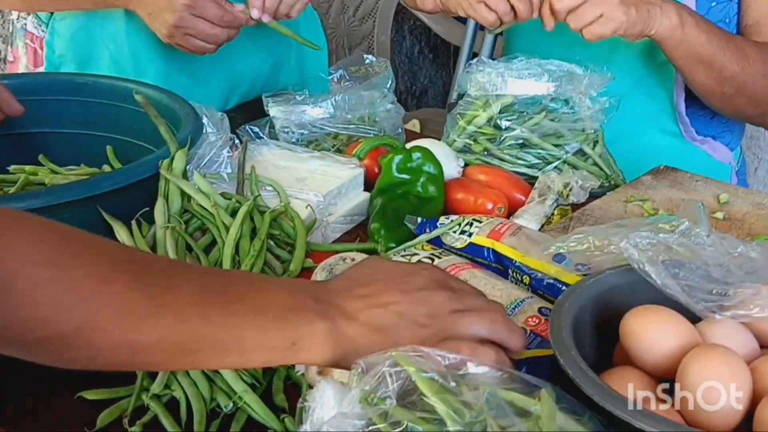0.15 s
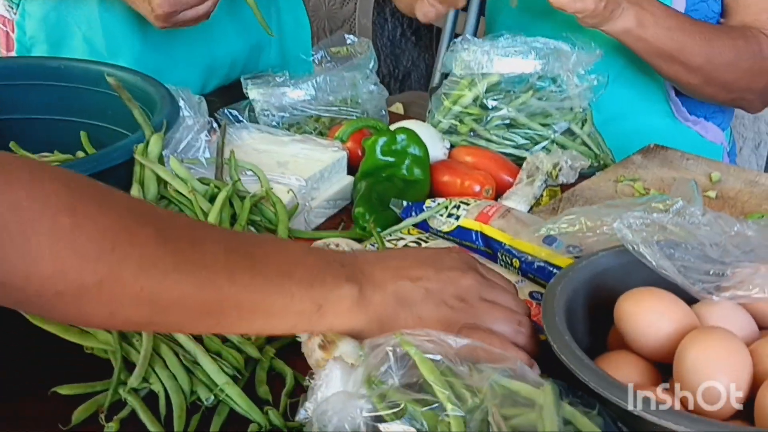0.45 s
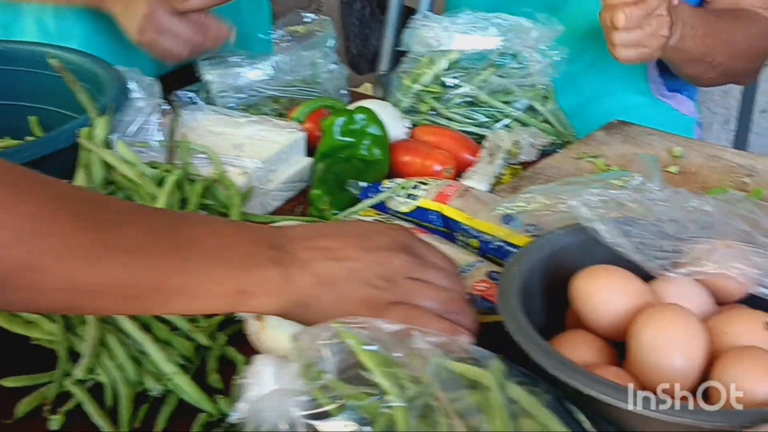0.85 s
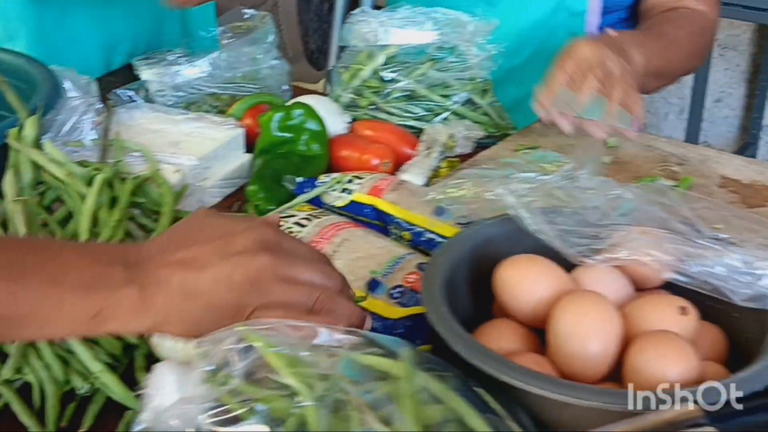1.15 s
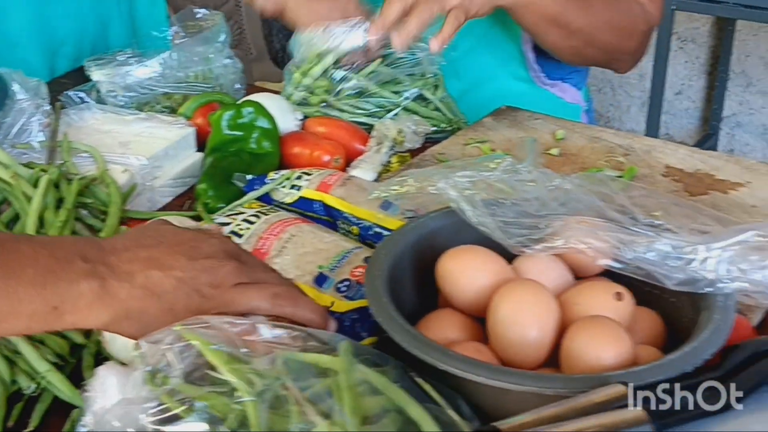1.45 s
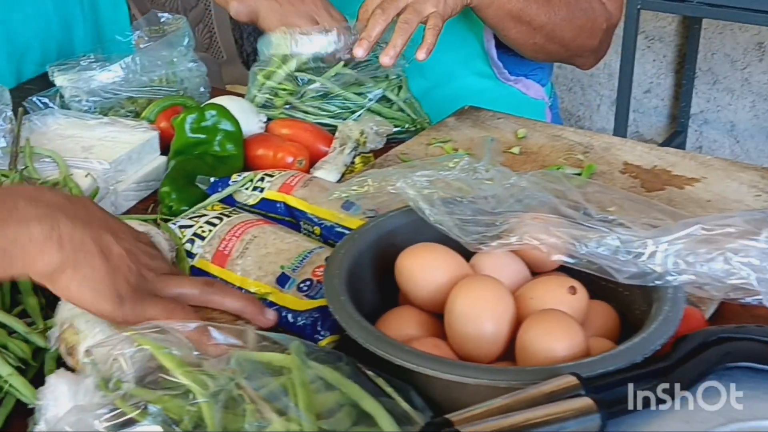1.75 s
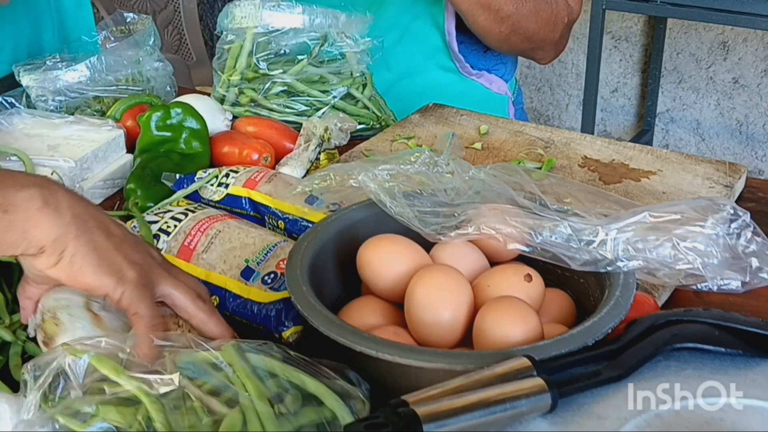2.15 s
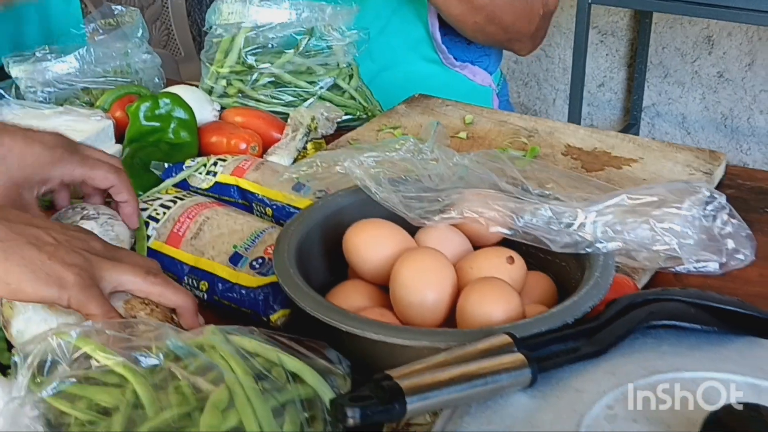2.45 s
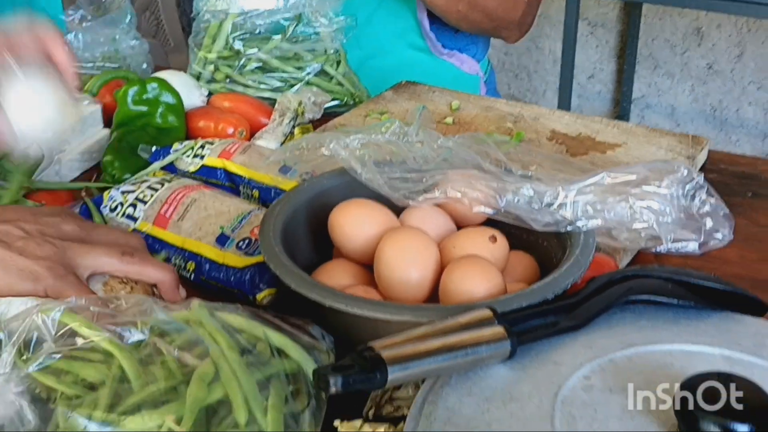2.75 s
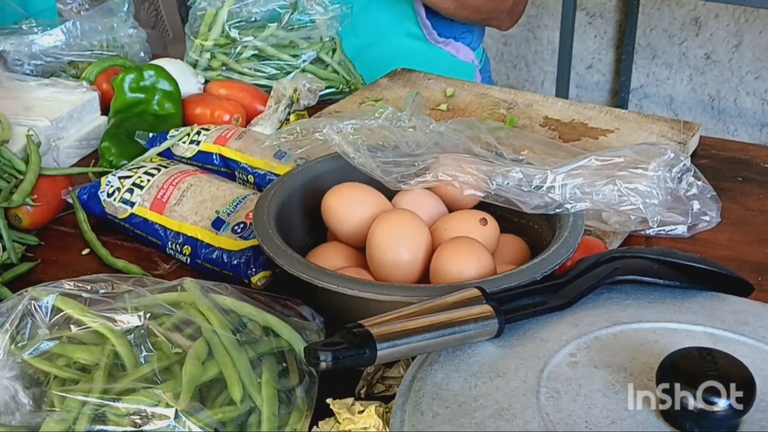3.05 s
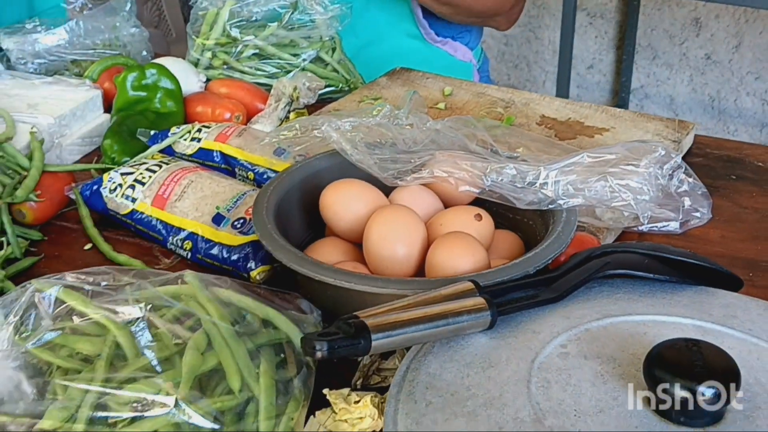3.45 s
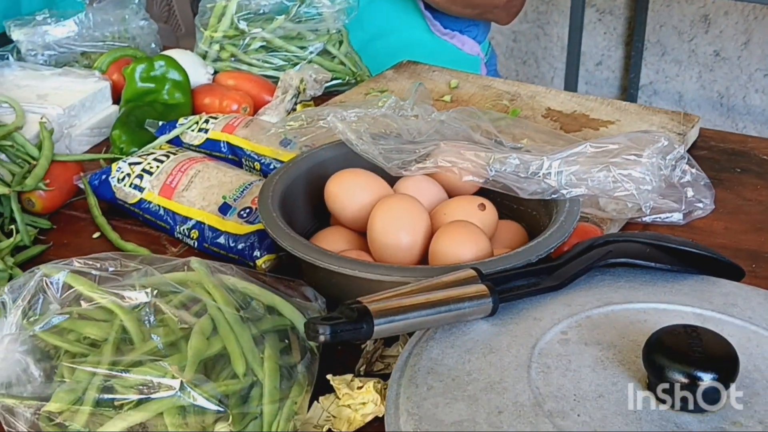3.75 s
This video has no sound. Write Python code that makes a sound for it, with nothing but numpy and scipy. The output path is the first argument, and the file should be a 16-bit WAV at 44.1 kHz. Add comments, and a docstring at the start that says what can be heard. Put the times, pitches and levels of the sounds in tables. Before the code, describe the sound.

Green beans snap crisply at about 0.3, 1.8 and 3.0 seconds, each a tiny dry crack with tearing fibres. Plastic bags crinkle in bursts, busiest around 0.9-1.2 and 2.0-2.25, with soft rubbing and short scrapes. Light knocks come at 2.1-2.6, then 3.5, and a stronger resonant table clatter at 3.7-3.85. Close stereo, slightly right, short walled-patio echo, faint hiss, thin whirring whistles and low rumble.

```python
"""Snapping beans on a walled patio

Green beans are snapped by hand at a table, a little right of a close two-port microphone.
Each snap is a click plus tearing fibres; bags crinkle and rustle in bursts of tiny random clicks.
Rubbing and scrapes drive resonances with slips; knocks are rattling contacts with table-top modes.
The patio walls answer with shaped noise; behind are filtered-noise hiss, whistles and a low rumble."""
import sys
import numpy as np
from scipy import signal
from scipy.fft import rfft, irfft
from scipy.io import wavfile

SR = 44100
rng = np.random.default_rng(int(sys.argv[2]) if len(sys.argv) > 2 else 0)


def digitize_waveform(pressure):
    """Quantize a signal to 16-bit integers and store it at the path in sys.argv[1].

    Rows of a 2-D input are taken as channels; values are limited to [-1, 1].
    """
    field = np.atleast_2d(pressure).T
    bounded = np.clip(field, -1, 1)
    quanta = np.round(bounded * 32767).astype(np.int16)
    wavfile.write(sys.argv[1], SR, quanta)


N = 171990
TIME = np.arange(N) / SR
BAG_LEAD_S = .0009  # right port ahead of left, for bags and hands

# Bean snaps: (time [s], level [dB], brightness [dB], tearing fibres [dB], room [dB])
SNAPS = [(.2804, -4.5, -4, -3, -2), (1.7954, -8, 11, -7, -5), (2.9771, -7, 3.5, -2, 2.5)]
# Spectrum of a snap: (frequency [Hz], level [dB])
SNAP_COLOUR = [(200, -33), (900, -26), (1800, -9), (3000, 1.5), (4200, 5), (5400, 6.5), (6800, 6),
               (8200, -3), (11000, 0), (16000, -10.5)]
CRACK_S, TEAR_S, FIBRES_PER_S, SNAP_LEAD_S = .00016, .002, 9000, .00102


def snaps():
    """The pod's skin cracks at once and the remaining fibres tear within milliseconds."""
    out = np.zeros((2, N))
    for s, db, bright_db, fibres_db, room_db in SNAPS:
        crack = burst(CRACK_S) / 4
        crack[0] = 1
        pod = unit(crack) + amp(fibres_db) * burst(TEAR_S, FIBRES_PER_S)
        left = np.roll(pod, round(SNAP_LEAD_S * SR))
        # so short a snap returns as the patio's echo itself
        heard = np.array([left, pod]) + amp(room_db) * patio(count=len(pod))
        tilt = [(3000, -bright_db / 2), (7000, 0), (12000, bright_db)]
        coloured = np.array([colour(colour(side, SNAP_COLOUR), tilt) for side in heard])
        add(out, s, amp(db) * coloured)
    return out


# Sharp crinkles of the bags: (time [s], level [dB])
CRINKLES = [(.1226, -20), (.184, -25), (.2418, -23), (.837, -27), (.872, -24.5), (.8974, -20), (.9135, -24),
            (.9353, -17), (.945, -23), (.9925, -24), (1.0555, -26), (1.0899, -27), (1.1164, -18.5),
            (1.1545, -22), (1.1705, -26), (1.2615, -22), (1.3565, -25), (1.51, -34), (2.0318, -19.5),
            (2.0662, -19), (2.0777, -24), (2.085, -10), (2.096, -30), (2.1181, -29), (2.124, -18.5),
            (2.1675, -32), (2.1879, -19), (2.2325, -18), (2.2358, -15.5), (2.6155, -22.5), (2.797, -22.5),
            (2.8235, -19), (2.968, -15)]
# Spectrum of a crinkle: (frequency [Hz], level [dB])
CRINKLE_COLOUR = [(300, -29), (1500, -17.5), (3000, -2.5), (6000, 2.5), (9500, 10), (12000, 4.5),
                  (16000, -6)]
CRINKLE_S, CRINKLE_ROOM_DB = .0005, -4.5


def crinkles():
    """Single creases of plastic flip over, each a very short burst of clicks."""
    out = np.zeros((2, N))
    for s, db in CRINKLES:
        crease = colour(burst(CRINKLE_S, count=9000), CRINKLE_COLOUR)
        add(out, s, amp(db) * place(crease, BAG_LEAD_S, CRINKLE_ROOM_DB))
    return out


# Fine crackle of the plastic: (time [s], level [dB])
CRACKLE = [(0, -44), (.27, -46.5), (.37, -55.5), (.46, -64.5), (.53, -52.5), (.76, -53), (.92, -47),
           (1.2, -49.5), (1.45, -47), (1.65, -53.5), (1.78, -46), (2.1, -46.5), (2.3, -52), (2.53, -54.5),
           (2.65, -49), (2.75, -54.5), (2.84, -50), (2.94, -54), (3.1, -58), (3.15, -42), (3.21, -55.5),
           (3.31, -54), (3.36, -48.5), (3.43, -53.5), (3.58, -54), (3.67, -61), (3.77, -48), (3.9, -81)]
# Spectrum of the crackle: (frequency [Hz], level [dB])
CRACKLE_COLOUR = [(500, -34.5), (2500, -21.5), (4500, -8.5), (7000, -5), (9500, 2), (12000, -4.5),
                  (16000, -14)]
CRACKLE_PER_S, CRACKLE_SPREAD_DB, CLUMP_DB, CRACKLE_ROOM_DB = 2200, 3.8, 3.5, -1.5


def crackle():
    """Many tiny slips of plastic, of uneven size, rise and fall in clumps."""
    size = amp(CRACKLE_SPREAD_DB * np.minimum(rng.exponential(1, N), 5))
    clumps = np.interp(TIME, np.linspace(0, N / SR, 160), rng.standard_normal(160))
    slips = size * rng.choice([-1, 1], N) * (rng.random(N) < CRACKLE_PER_S / SR)
    grains = np.sqrt(N) * unit(colour(slips * amp(CLUMP_DB * clumps), CRACKLE_COLOUR))
    heard = place(grains, BAG_LEAD_S, CRACKLE_ROOM_DB)
    # the hypot keeps direct sound and echo together at the stated level
    return level(CRACKLE) * heard / np.hypot(1, amp(CRACKLE_ROOM_DB))


# Hands rubbing over beans and bags: (time [s], level before the trim [dB])
RUB = [(0, -61.5), (.07, -54.5), (.14, -61), (.24, -55), (.39, -70), (.48, -68), (.62, -56), (.75, -76),
       (.83, -59), (.89, -65.5), (.95, -50.5), (1.0, -64), (1.2, -61), (1.3, -62), (1.52, -61), (1.62, -78),
       (1.76, -70.5), (1.82, -53), (1.95, -71), (2.0, -55), (2.05, -60), (2.1, -48), (2.18, -58.5),
       (2.5, -68), (2.64, -62), (2.76, -71.5), (2.83, -51.5), (2.92, -78), (3.16, -67.5), (3.22, -71),
       (3.9, -79)]
# Spectrum of the rubbing: (frequency [Hz], level [dB])
RUB_COLOUR = [(200, -16), (500, -21), (800, -4), (1200, -5.5), (1700, 3.5), (2600, -2.5), (4000, 0.5),
              (7000, -6.5), (12000, -25)]
RUB_PER_S, RUB_TRIM_DB, RUB_ROOM_DB = 110, -1, -4  # slips per second in each resonance


def rubbing(low_hz=700, high_hz=7000, width_hz=300, spurt_db=5.5, spurt_s=.028, count=22):
    """Beans and folds of plastic catch and slip, each in its own spurts and at its own drifting pitch."""
    out = np.zeros(N)
    knots = np.arange(400) * spurt_s
    r = np.exp(-np.pi * width_hz / SR)
    for hz in np.linspace(low_hz, high_hz, count):
        walks = np.clip(rng.standard_normal((2, len(knots))), -2, 2)
        spurts, drift = (np.interp(TIME, knots, row) for row in walks)
        slips = amp(spurt_db * spurts) * rng.standard_normal(N) * (rng.random(N) < RUB_PER_S / SR)
        turn = np.exp(2j * np.pi * np.cumsum(hz + width_hz / 4 * drift) / SR)
        # shift the drifting pitch to 0 Hz, resonate there, shift back; the offset avoids denormals
        resonance = signal.lfilter([1], [1, -2 * r, r * r], slips / turn + 1e-18)
        out += (turn * resonance).real
    grains = np.sqrt(N) * unit(colour(out, RUB_COLOUR))
    return amp(RUB_TRIM_DB) * place(level(RUB) * grains, BAG_LEAD_S, RUB_ROOM_DB)


# Short scrapes of beans and bags sliding: (start [s], length [s], level [dB], resonance [Hz])
SCRAPES = [(.055, .04, -52, 1850), (.145, .075, -60, 1750), (.21, .06, -53, 5200), (.568, .025, -60, 1400),
           (.605, .04, -59, 1450), (.61, .13, -68, 780), (.93, .04, -54, 1450), (1.076, .022, -50, 3900),
           (1.18, .04, -58, 1900), (1.452, .025, -59, 2900), (1.52, .022, -57, 2900),
           (1.785, .03, -59, 750), (1.988, .025, -52, 2900), (2.07, .04, -50, 5000), (3.08, .05, -62, 3250),
           (3.135, .045, -58, 2800), (3.556, .03, -54, 2400), (3.567, .028, -49, 3050),
           (3.58, .025, -55, 3700)]
SCRAPE_Q, SCRAPE_PER_S, SCRAPE_ROOM_DB = 2.4, 800, -6


def scrapes(count=8000):
    """Each scrape is a swell of little slips that excites one broad resonance."""
    out = np.zeros((1, N))
    t = np.arange(count) / SR
    f = np.fft.rfftfreq(count, 1 / SR) + 1  # +1 avoids dividing by zero
    for s, length, db, hz in SCRAPES:
        swell = np.sin(np.pi * np.minimum(t / length, 1))
        slips = swell * rng.standard_normal(count) * (rng.random(count) < SCRAPE_PER_S / SR)
        resonance = 1 / (1 + 1j * SCRAPE_Q * (f / hz - hz / f)) ** 2
        sound = irfft(rfft(slips) * resonance, count)
        add(out, s, amp(db) * np.sqrt(length * SR) * unit(sound)[None])
    return place(out[0], BAG_LEAD_S, SCRAPE_ROOM_DB)


# Modes of the table top: (frequency [Hz], level [dB], t60 [s])
TABLE = [(128, -17, .13), (163, -12, .16), (201, -9, .16), (270, -2, .09), (301, 2, .11), (345, -6, .1),
         (700, -12, .18), (790, -12, .2), (937, -13, .2), (1179, -10, .15), (1800, -20, .15)]
TABLE_RISE_S = .002


def table_ring(count):
    """The table top rings as decaying sines at its modes, with energy 1."""
    t = np.arange(count) / SR
    ring = sum(amp(db - 60 * t / t60) * np.sin(2 * np.pi * (hz * t + rng.random()))
               for hz, db, t60 in TABLE)
    return unit(ring * (1 - np.exp(-t / TABLE_RISE_S)))


# Knocks on and about the table: (time [s], weight at 350 Hz [dB], at 1 kHz [dB], at 2.4 kHz [dB],
# at 7 kHz [dB], rattle decay [s], table-top ring [dB], room [dB])
KNOCKS = [(2.138, -13, -4, -21, -24, .012, -46, -5.5), (2.284, 0.5, 6.5, 1.5, -13, .004, -42, 0),
          (2.301, -0.5, 9.5, 3, -4.5, .006, -38, -1), (2.355, 1.5, -9, -5.5, -12, .008, -27.5, 0.5),
          (2.583, 2, -20, -26, -37, .008, -43, -1.5), (2.618, -2, -17, -23, -41, .008, -48, -4),
          (3.485, 3, -23, -38, -43, .026, -30, -8), (3.532, 4, 15, -28, -48, .008, -26, -9),
          (3.549, 2, 5, -30, -48, .006, -28, -8), (3.723, 15, -1, -16, -11, .008, -4, -6),
          (3.735, 11, 10, -14, -10, .012, -4, -3), (3.764, 6, 3, -12, -11, .012, -11, -5),
          (3.795, 6, 0, -18, -22, .01, -7, -7), (3.824, 1, -6, -29, -26, .01, -14, -9),
          (3.843, 2, -9, -32, -28, .007, -16, -12)]
KNOCK_BASS_DB, KNOCK_UPPER_DB, KNOCK_TOP_DB, KNOCK_LEAD_S = -30.5, 0.5, -15.5, .0005


def knocks():
    """Each knock is a short rattling contact that sets the table top ringing by its own amount."""
    out = np.zeros((2, N))
    for s, low_db, mid_db, high_db, treble_db, rattle_s, top_db, room_db in KNOCKS:
        spectrum = [(130, low_db + KNOCK_BASS_DB), (220, low_db + KNOCK_BASS_DB / 2),
                    (330, low_db), (520, low_db - 11),
                    (700, (low_db + mid_db) / 2 - 4.5), (950, mid_db),
                    (1500, (mid_db + high_db) / 2 + KNOCK_UPPER_DB), (2400, high_db),
                    (3800, (high_db + treble_db) / 2 - 3.5), (7000, treble_db),
                    (14000, treble_db + KNOCK_TOP_DB)]
        contact = colour(burst(rattle_s, per_s=4000), spectrum)
        ring = amp(top_db) * table_ring(len(contact))
        add(out, s, place(contact, KNOCK_LEAD_S, room_db) + place(ring, KNOCK_LEAD_S, room_db=-13))
    return out


# Low rumble: (time [s], level [dB])
RUMBLE = [(0.0, -69.5), (1.83, -70), (1.89, -61), (2.2, -78.5), (2.29, -59.5), (2.43, -75), (2.51, -57),
          (2.59, -68), (2.74, -53.5), (2.78, -64.5), (3.44, -71), (3.57, -64), (3.65, -83), (3.7, -61)]
# Spectrum of the rumble: (frequency [Hz], level [dB])
RUMBLE_COLOUR = [(20, -15), (50, -3.5), (75, 4.5), (120, -0.5), (170, -12), (300, -18.5), (700, -24),
                 (2000, -28), (4000, -35), (16000, -43)]


def rumble(side_db=-11):
    """Low noise, nearly the same at both ports; a weaker part is opposite in sign between them."""
    side = amp(side_db) * noise(RUMBLE_COLOUR) * np.array([[1], [-1]])
    return level(RUMBLE) * (noise(RUMBLE_COLOUR) + side)


# Spectrum of the steady hiss: (frequency [Hz], level [dB])
HISS_COLOUR = [(1000, -18.5), (3600, -29.5), (4500, -6.5), (6200, -5), (7600, -6), (10000, 1.5),
               (11800, -12.5), (15500, -7.5)]
HISS_DB = -57.5


def hiss():
    """Steady high noise, independent at the two ports."""
    return amp(HISS_DB) * np.array([noise(HISS_COLOUR), noise(HISS_COLOUR)])


# Narrow whistles in the hiss: (frequency [Hz], width [Hz], level before the curve below [dB])
WHISTLES = [(4480, 260, -64.5), (5980, 280, -60), (6600, 400, -61), (10500, 500, -62.5), (12755, 40, -69)]
# Common gain of the whistles: (time [s], gain [dB])
WHISTLE_LEVEL = [(0, -3.5), (2.2, -3), (2.9, 2.5), (3.9, 3.5)]
WHISTLE_RIGHT_DB, WHIRR_HZ, WHIRR_DEPTH = -9.5, 96.4, .55


def whistles():
    """Narrow bands of noise pulse fast together, weaker at the right port."""
    f = np.fft.rfftfreq(N, 1 / SR)
    bands = sum(amp(db) * unit(1 / (1 + (2 * (f - hz) / width) ** 2)) for hz, width, db in WHISTLES)
    tones = irfft(rfft(rng.standard_normal((2, N))) * bands, N) * np.sqrt(N / 2)
    pulse = 1 + WHIRR_DEPTH * np.cos(2 * np.pi * WHIRR_HZ * TIME)
    return tones * pulse * level(WHISTLE_LEVEL) * amp([[0], [WHISTLE_RIGHT_DB]])


# Decay of the patio: (frequency [Hz], t60 [s])
PATIO = [(150, 0.27), (500, 0.28), (1500, 0.2562), (3000, 0.3029), (6000, 0.2667), (10000, 0.175),
         (16000, 0.01)]
# First echoes from near walls: (delay [s], level [dB])
ECHOES = [(.0073, -14), (.0135, -16.5), (.019, -15.5)]
ROOM_ONSET_S = .005


def patio(count=22050):
    """Stereo echo of the patio: a few near walls, then a tail that dies by band."""
    t = np.arange(count) / SR
    hz, at, z = signal.stft(rng.standard_normal((2, count)), SR, nperseg=256)
    decay = amp(-60 * at / read(PATIO, hz)[:, None])
    tail = signal.istft(z * decay, SR, nperseg=256)[1][:, :count]
    tail = unit(tail * (1 - np.exp(-(t / ROOM_ONSET_S) ** 2)))
    for s, db in ECHOES:
        # each port gets its own slightly shifted delay
        delays = (s * SR * rng.uniform(.94, 1.06, 2)).astype(int)
        tail[[0, 1], delays] += amp(db)
    return unit(tail)


def place(x, lead_s, room_db):
    """The sound reaches the right port first, then the left, then comes back from the walls."""
    left = np.pad(x, (round(abs(lead_s) * SR), 0))[:len(x)]
    echo = signal.oaconvolve(x[None].repeat(2, 0), patio(), axes=1)[:, :len(x)]
    return np.array([left, x]) + amp(room_db) * echo


def burst(decay_s, per_s=SR, count=24000):
    """A cluster of tiny clicks that dies away, of energy 1."""
    clicks = rng.standard_normal(count) * (rng.random(count) < per_s / SR)
    return unit(clicks * np.exp(-np.arange(count) / SR / decay_s))


def noise(spectrum):
    """Steady noise of level 1 with the given spectrum."""
    return np.sqrt(N) * unit(colour(rng.standard_normal(N), spectrum, size=8192))


def colour(x, points, size=2048):
    """Causal, minimum-phase filter with the given spectrum."""
    log_gain = np.log(amp(read(points, abs(np.fft.fftfreq(size, 1 / SR)))))
    kernel = np.fft.ifft(np.exp(np.conj(signal.hilbert(log_gain)))).real
    return signal.oaconvolve(x, kernel)[:len(x)]


def read(points, hz):
    """Reads a spectrum on a log-frequency axis."""
    f, value = np.transpose(points)
    return np.interp(np.log(hz + 1), np.log(f), value)


def level(points):
    """Gain over time from a curve in dB."""
    return amp(np.interp(TIME, *np.transpose(points)))


def amp(db):
    """Decibels to gain."""
    return 10 ** (np.asarray(db) / 20)


def unit(x):
    """Scales a sound to energy 1 per channel."""
    return x / np.sqrt(np.sum(x ** 2, -1, keepdims=True) + 1e-20)


def add(mix, s, sound):
    """Mixes a sound in at time s, cut off at the end of the mix."""
    part = mix[:, max(round(s * SR), 0):][:, :sound.shape[1]]
    part += sound[:, :part.shape[1]]


def scene():
    """Beans, bags, hands and table in front; rumble, hiss and whistles behind."""
    near = snaps() + crinkles() + crackle() + rubbing() + scrapes() + knocks()
    return near + rumble() + hiss() + whistles()


# Colour of the left microphone port: (frequency [Hz], gain [dB])
LEFT_PORT = [(300, 0), (1000, -1), (2500, 0.5), (6000, 1.5), (8500, 4), (10000, -2), (11800, -9.5),
             (14000, -8), (16000, -1)]
# Colour of the right microphone port: (frequency [Hz], gain [dB])
RIGHT_PORT = [(300, -1.5), (1000, 0), (2500, -1), (6000, -0.5), (8000, -5), (10300, 7.5), (11800, 5.5),
              (14000, 4.5), (16000, 7)]
EDGE_HZ = 15900


def record(dry):
    """Each port colours the treble in its own way; then a steep low-pass limits the band."""
    ports = np.array([colour(dry[0], LEFT_PORT), colour(dry[1], RIGHT_PORT)])
    low_pass = signal.firwin(255, EDGE_HZ, window=("kaiser", 8), fs=SR)
    return signal.oaconvolve(ports, low_pass[None], "same")


dry = scene()
out = record(dry)
digitize_waveform(out)
```